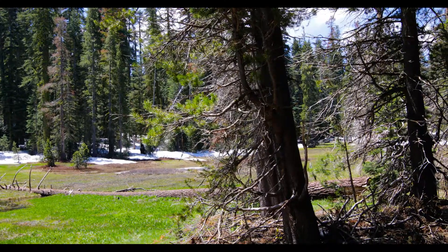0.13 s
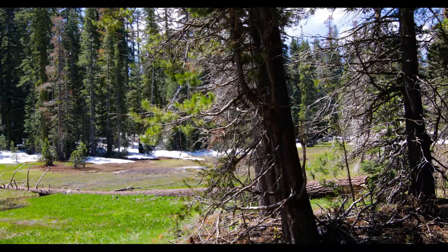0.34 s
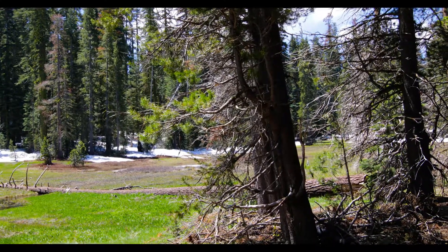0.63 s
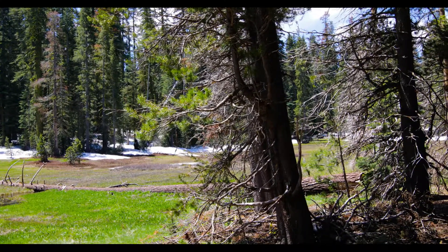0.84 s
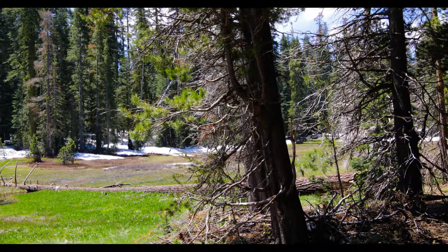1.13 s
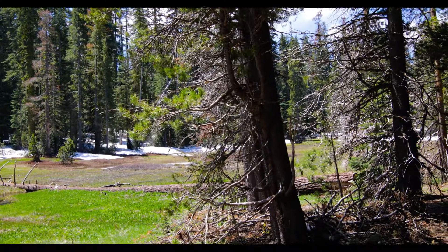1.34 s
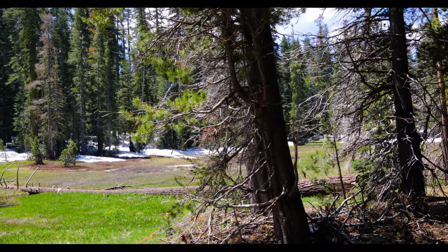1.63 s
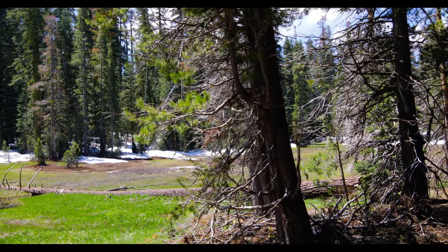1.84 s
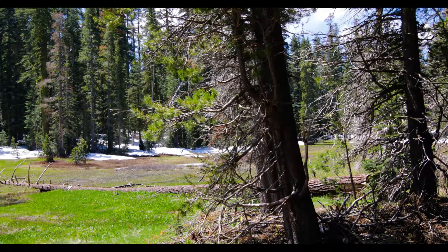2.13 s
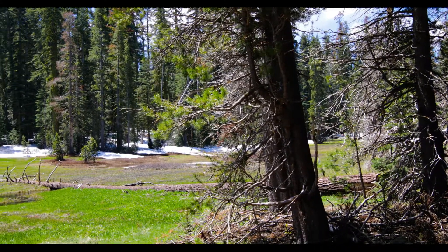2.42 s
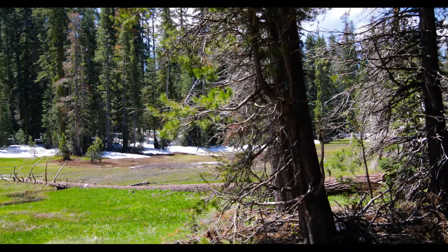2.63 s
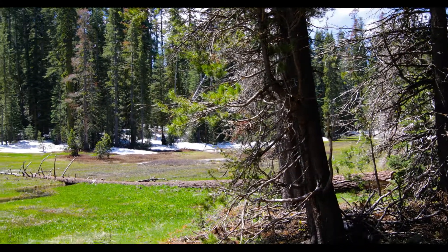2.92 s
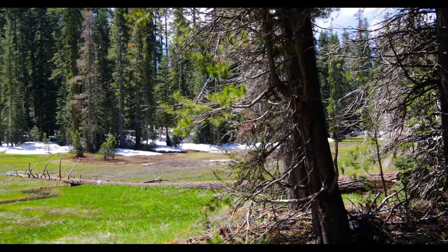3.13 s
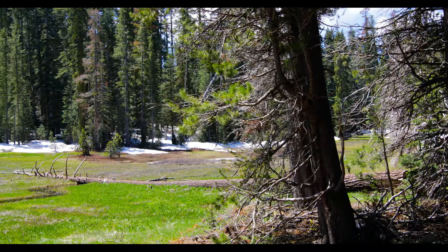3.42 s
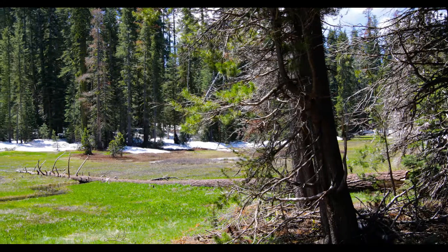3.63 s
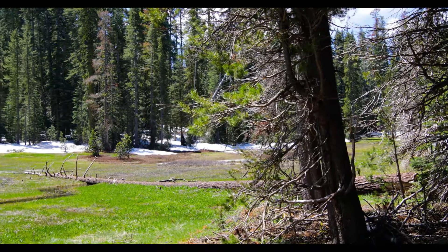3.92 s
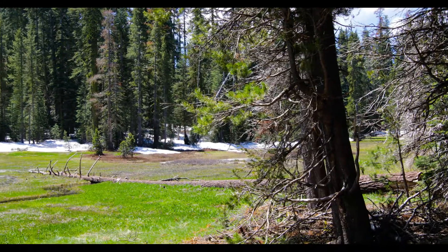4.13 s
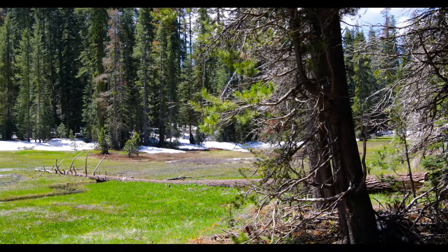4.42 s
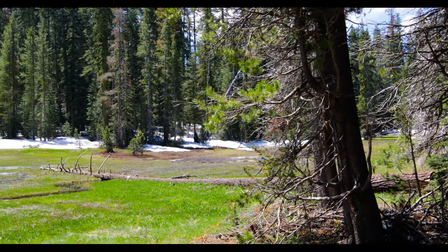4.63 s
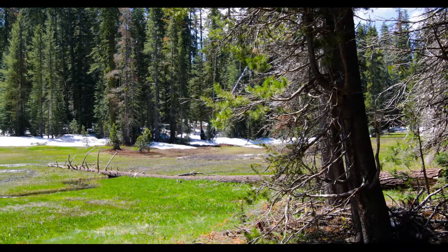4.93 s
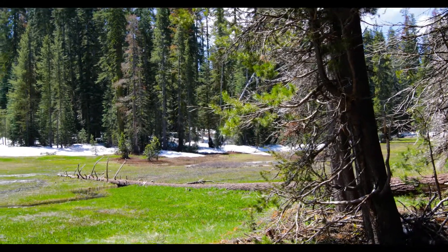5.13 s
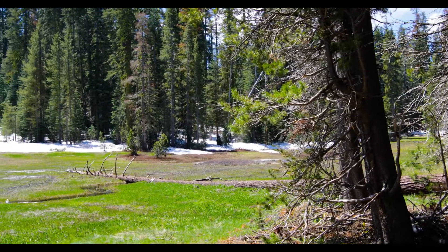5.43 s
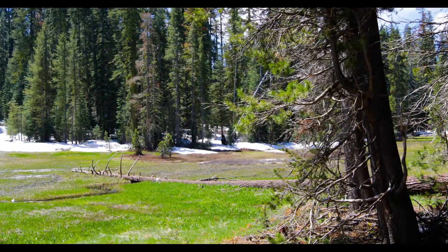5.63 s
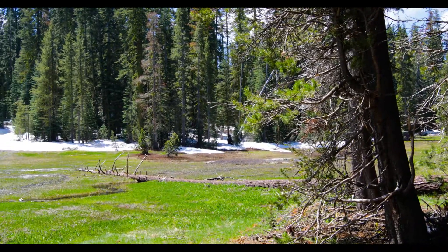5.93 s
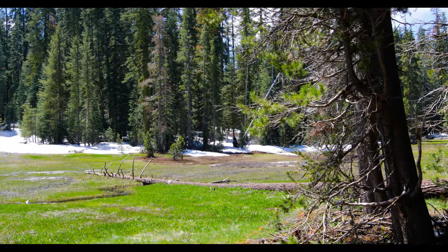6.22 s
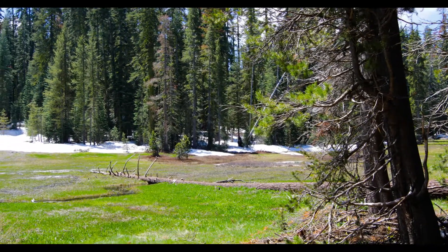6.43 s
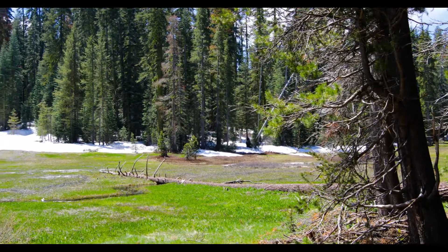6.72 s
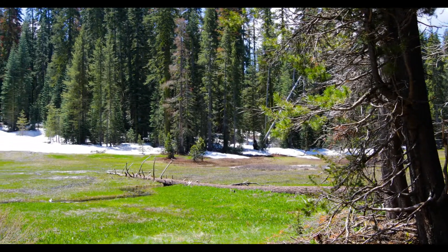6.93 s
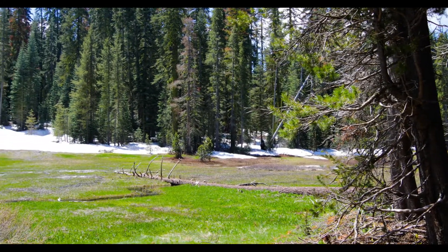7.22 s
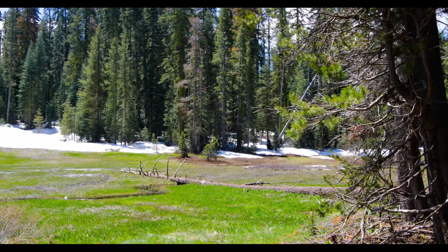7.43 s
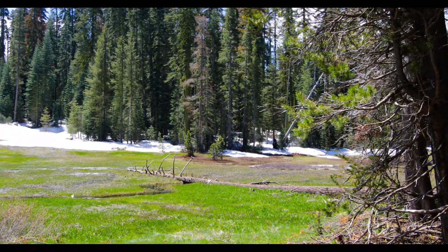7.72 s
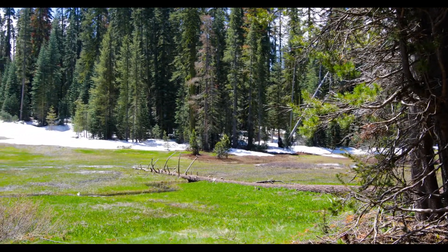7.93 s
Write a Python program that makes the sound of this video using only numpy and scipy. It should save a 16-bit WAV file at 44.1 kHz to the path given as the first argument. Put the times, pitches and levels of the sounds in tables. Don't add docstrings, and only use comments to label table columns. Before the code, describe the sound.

In a wet meadow ringed by conifers, nearby male frogs answer each other in quick pulsed croaks, some throaty and hollow, others higher and tighter, above a continuous blurred chorus. A quieter warbler sings quick sliding notes and a brief trill among faint twitter from one to five seconds, pauses, then returns at seven. One mono microphone low in the grass catches gentle low air, soft bumps and steady hush.

```python
import sys
import numpy as np
from scipy import signal
from scipy.fft import rfft, irfft
from scipy.io import wavfile
from scipy.ndimage import uniform_filter1d

SR = 44100
rng = np.random.default_rng(int(sys.argv[2]) if len(sys.argv) > 2 else 0)


def digitize_waveform(pressure):
    field = np.atleast_2d(pressure).T
    bounded = np.clip(field, -1, 1)
    quanta = np.round(bounded * 32767).astype(np.int16)
    wavfile.write(sys.argv[1], SR, quanta)


def ratio(d):
    e = np.asarray(d, float) / 20
    return 10 ** e


N = 355446
TIME = np.arange(N) / SR

# (first pulse [s], length [s], level [dB])
DEEP = [(.533, 0.051, -31), (1.408, 0.053, -28.5), (1.813, 0.04, -35.5), (2.168, 0.0506, -31),
        (2.261, 0.022, -38), (2.619, 0.056, -32.5), (2.901, 0.046, -31.5), (3.415, 0.0836, -33.5),
        (3.7, 0.016, -31), (4.188, 0.023, -31.5), (4.253, 0.019, -31.5), (4.412, 0.056, -31.5),
        (4.877, 0.049, -33.5), (5.184, 0.041, -31.5), (5.29, 0.019, -40), (5.541, 0.0505, -30),
        (5.629, 0.011, -31), (6.05, 0.075, -34.5), (6.6, 0.068, -37.5), (6.7, 0.049, -35),
        (7.058, 0.01, -32.5), (7.841, 0.019, -31.5), (7.901, 0.044, -31.5)]
# (first pulse [s], length [s], level [dB])
LARGE = [(.632, 0.03, -32), (1.317, 0.13, -43), (1.493, 0.056, -32), (3.003, 0.026, -28.5),
         (3.769, 0.035, -31.5), (3.977, 0.028, -34.5), (4.499, 0.019, -28), (4.749, 0.045, -37),
         (4.949, 0.032, -30.5), (5.241, 0.041, -35.5), (6.158, 0.036, -33), (6.724, 0.044, -35),
         (7.103, 0.054, -36), (7.4, 0.04, -37.5)]
# (first pulse [s], length [s], level [dB])
MIDDLE = [(.376, 0.104, -42), (.554, 0.024, -38), (1.432, 0.0096, -35), (1.775, 0.063, -40),
          (1.876, 0.057, -33.5), (2.561, 0.061, -37.5), (2.905, 0.04, -42), (3.094, 0.012, -30),
          (3.339, 0.09, -37.5), (3.414, 0.022, -37.5), (3.47, 0.0091, -30), (3.865, 0.0084, -30),
          (4.814, 0.014, -40), (4.059, 0.026, -34.5), (5.289, 0.056, -30.5), (5.905, 0.035, -35),
          (6.813, 0.025, -32.5), (7.466, 0.05, -33.5)]
# (first pulse [s], length [s], level [dB])
SMALL = [(.174, 0.058, -37), (.896, 0.1045, -35.5), (1.023, 0.0052, -30.5), (1.066, 0.052, -29.5),
         (1.558, 0.021, -37.5), (1.8, 0.088, -38), (2.282, 0.03, -31.5), (2.603, 0.084, -42),
         (2.718, 0.049, -33), (3.155, 0.077, -37), (3.493, 0.0706, -32.5), (3.608, 0.005, -31),
         (4.25, 0.036, -33.5), (4.46, 0.128, -34.5), (5.461, 0.04, -33.5), (6.35, 0.05, -38.5),
         (6.44, 0.068, -32.5), (.402, 0.037, -35.5), (.466, .004, -36.5), (5.837, 0.013, -39.5),
         (6.98, 0.037, -50)]
# (first pulse [s], length [s], level [dB])
TINY = [(.299, 0.02, -30), (.676, 0.069, -36), (1.173, 0.019, -31), (1.936, 0.034, -33), (2.02, 0.023, -32),
        (2.378, 0.039, -35), (3.289, 0.028, -31.5), (4.585, 0.036, -30), (5.054, 0.035, -34),
        (5.413, 0.011, -30), (5.568, 0.014, -34.5), (6.248, 0.049, -38), (6.564, 0.025, -32.5),
        (7.235, 0.055, -39.5), (7.571, 0.037, -33), (7.87, 0.011, -44)]
# (croaks, sac tone [Hz], pulse rate [1/s])
VOICES = [
    (DEEP, 1655, 140),
    (LARGE, 1810, 106),
    (MIDDLE, 1915, 100),
    (SMALL, 1995, 96),
    (TINY, 2085, 100),
]
# (first pulse [s], level [dB])
THROATY = [(0.475, -33), (0.899, -28.5), (1.092, -24.5), (1.507, -21), (1.686, -37), (2.03, -29.5),
           (2.275, -30), (2.688, -29), (2.852, -43), (3.077, -31.5), (3.285, -28.5), (3.551, -42.5),
           (3.968, -24), (4.497, -25.5), (5.057, -32.5), (5.194, -44), (5.55, -19), (6.244, -25),
           (6.69, -24), (6.888, -53), (7.12, -35), (7.391, -30), (6.755, -25), (6.8, -21.5), (4.42, -26),
           (4.59, -31.5)]
# (time [s], level [dB])
THROAT = [
    (0, -15.5),
    (3.7, -16),
    (4, -12),
    (4.4, -15.5),
    (5.5, -12),
    (5.8, -15),
    (6.3, -12),
    (6.72, -17),
    (7.1, -16.5),
    (7.6, -16.5),
]
# (time [s], level [dB])
CHORUS = [(0, -37), (.6, -35.5), (1.1, -37), (1.27, -40), (1.5, -35.5), (1.7, -40.5), (2.3, -37.5),
          (2.48, -42), (2.7, -32.5), (2.84, -38.5), (4.1, -37), (4.35, -40.5), (5.0, -37.5), (5.6, -35.5),
          (5.75, -41.5), (6.6, -38.5), (7.7, -36.5), (8.06, -34.5)]

# (time [s], start pitch [Hz], end pitch [Hz], level [dB])
FALLS = [(2.179, 3370, 2530, -52), (2.03, 4490, 3840, -62), (1.98, 4750, 4160, -64),
         (2.195, 4400, 3730, -67), (2.378, 4250, 3460, -62), (2.565, 3310, 2920, -48.5),
         (2.69, 2950, 2320, -59), (2.968, 3230, 2650, -46.5), (3.188, 4900, 3806, -69),
         (3.46, 4700, 3750, -63), (3.483, 3500, 2740, -54), (3.68, 3500, 2480, -55),
         (3.807, 3410, 2370, -50.5), (3.98, 3680, 2600, -50.5), (4.57, 4880, 4400, -70),
         (4.638, 3600, 2520, -55), (4.919, 4280, 3580, -62.5), (1.67, 3930, 2550, -60),
         (1.72, 4700, 4000, -74), (7.124, 4340, 3330, -71), (7.49, 4200, 4000, -61),
         (7.627, 3240, 2520, -53), (7.775, 4460, 3700, -66), (2.142, 2780, 2500, -52)]
# (time [s], start pitch [Hz], end pitch [Hz], level [dB])
RISES = [(1.345, 5300, 6400, -72), (1.467, 5230, 6400, -70), (1.585, 5050, 6500, -66),
         (1.78, 3860, 4770, -67), (1.96, 4200, 4690, -64), (2.229, 2560, 2920, -54),
         (2.25, 2960, 3110, -48.5), (2.275, 3020, 3100, -60), (2.16, 2700, 3700, -58),
         (2.319, 4150, 4950, -61.5), (2.34, 3200, 4210, -62), (2.502, 3470, 4430, -51.5),
         (2.548, 2700, 3370, -57), (2.672, 2760, 3270, -49.5), (2.656, 2610, 2790, -51),
         (2.71, 3170, 4280, -66), (2.872, 2900, 3700, -66), (3.214, 3480, 4030, -57),
         (3.247, 2875, 4020, -53), (3.28, 2590, 3750, -50), (3.317, 2650, 3970, -52),
         (3.609, 2680, 3440, -54), (3.874, 3200, 3370, -54), (3.893, 3350, 4480, -62),
         (4.535, 3270, 4040, -60), (4.73, 3720, 4040, -70), (4.806, 3140, 3560, -61),
         (5.912, 3010, 3110, -59), (7.12, 2730, 2970, -53), (7.96, 2820, 4350, -58)]
# (starts [s], notes as (delay [s], start pitch [Hz], end pitch [Hz], level [dB]))
SYLLABLES = [
    ([.942, 1.077, 1.211], [(0, 3850, 4230, -60), (.059, 5150, 3550, -63)]),
    ([7.238, 7.408, 7.578], [(.004, 3600, 4750, -63), (.034, 3400, 4400, -62), (.06, 4350, 3450, -62)]),
]
# (time [s], length [s], start pitch [Hz], end pitch [Hz], level [dB])
DRAWLS = [
    (1.995, .075, 4350, 3700, -60),
    (4.405, .016, 3750, 3800, -64),
    (3.068, .048, 4710, 3550, -61),
    (7.967, .075, 4500, 3750, -56),
    (7.7, .1, 660, 420, -62),
]
# (time [s], length [s], start
# pitch [Hz], end pitch [Hz], level [dB])
PACED = [(2.155, .012, 4270, 4500, -67), (2.17, .008, 4000, 3340, -60), (2.479, 0.022, 3180, 3920, -54.5),
         (2.528, 0.011, 4500, 2600, -52.5), (2.785, 0.013, 4840, 3150, -57),
         (2.803, 0.014, 3500, 4600, -56), (2.818, 0.034, 4310, 4490, -59.5), (2.87, 0.12, 4440, 4430, -74),
         (2.835, .012, 5200, 4500, -68), (2.903, 0.016, 3900, 2900, -68), (2.95, .01, 3900, 4000, -69),
         (2.978, 0.012, 5300, 4530, -67), (2.997, 0.0081, 5200, 4300, -70), (4.288, 0.014, 4620, 3600, -75),
         (4.147, .01, 3500, 2800, -55.5), (4.205, .012, 3300, 2400, -55), (4.278, 0.033, 2800, 3210, -49.5),
         (4.336, 0.018, 4750, 4350, -75), (4.382, 0.066, 4980, 3840, -71), (4.468, .012, 2880, 2750, -50),
         (4.525, .012, 3440, 3320, -58), (4.195, 0.02, 5400, 4900, -82), (4.657, 0.037, 4600, 3720, -65),
         (4.662, 0.028, 2650, 2600, -61), (4.705, .015, 4330, 4200, -69), (4.799, .011, 5100, 4500, -70),
         (4.825, 0.031, 3910, 4020, -62), (4.881, 0.02, 4800, 4300, -69),
         (1.338, .04, 7800, 7300, -78), (6.83, .04, 8100, 7800, -78), (4.78, .04, 8700, 8400, -83),
         (.835, .02, 4400, 4200, -68), (3.265, .02, 4700, 4200, -66), (4.6, .014, 4100, 3100, -64),
         (3.562, .012, 3820, 3780, -62), (3.545, .012, 5150, 5200, -69), (3.765, .018, 4100, 3600, -62),
         (4.098, .016, 4500, 3700, -66), (3.645, .014, 4750, 4600, -68), (3.015, .025, 4700, 5300, -68),
         (4.175, .02, 4600, 4250, -74), (1.095, .02, 3100, 3400, -58), (1.245, .012, 3800, 4300, -65),
         (.975, .012, 3800, 4300, -65), (7.682, .019, 5500, 4700, -66), (2.166, .012, 3000, 3200, -53),
         (2.7, .012, 3800, 3800, -66), (2.52, .012, 4200, 4700, -62), (2.66, .012, 4200, 4800, -70),
         (2.68, .01, 4800, 4200, -70), (3.09, .05, 2700, 2350, -56), (4.73, .015, 3700, 4100, -62),
         (3.165, .014, 5600, 4600, -70), (2.565, .012, 4100, 3700, -62), (3.215, .024, 4900, 5300, -69),
         (.9, .014, 3300, 3100, -58), (3.37, .012, 5300, 4600, -74), (3.775, .012, 3400, 3150, -57),
         (4.02, .012, 2750, 2650, -55), (4.06, .012, 3300, 2800, -60)]
# (time [s], length [s], middle pitch [Hz], level [dB])
TRILLS = [
    (1.773, 0.16, 3490, -48),
    (7.723, 0.15, 3470, -44.5),
]
# (time [s], hold [s], pitch [Hz], level [dB])
SEEP = [(0.868, 0.089, 7420, -75.5), (1.62, 0.08, 7100, -74), (1.967, 0.093, 7210, -67.5),
        (2.374, 0.049, 6020, -69.5), (3.974, 0.083, 6720, -76), (4.31, 0.047, 6800, -73),
        (4.6, .08, 6780, -76), (4.897, 0.054, 6900, -74), (5.199, 0.078, 6900, -72),
        (6.666, 0.044, 7040, -69), (6.741, 0.02, 7060, -63), (6.935, .059, 7430, -77),
        (7.143, 0.079, 7060, -67.5), (7.507, 0.1, 7360, -61), (7.827, 0.12, 7510, -60)]
# (time [s], length [s], pitch [Hz], level [dB])
RATTLES = [
    (.29, .04, 5200, -74),
    (1.085, .035, 5200, -72),
    (1.095, .03, 7700, -76),
    (2.73, .04, 5600, -75),
    (2.612, .05, 7700, -75),
    (2.715, .06, 7700, -69),
    (5.04, .08, 8300, -76),
    (7.92, .05, 5000, -70),
    (7.94, .04, 5800, -72),
]
CHIPS_DOWN = [1.712, 1.884, 2.063, 2.247, 2.425, 3.626, 7.17, 7.343, 7.511]
CHIPS_UP = [
    2.9,
]
# (from [s], to [s], slurs [count])
TWITTER = [
    (.9, 5.0, 150),
    (7.1, 8.06, 35),
]

# (time [s], level [dB])
BREEZE = [(0, -72), (.6, -49), (.72, -67), (1.8, -77), (2.0, -49.5), (2.12, -68), (2.4, -54), (2.6, -87),
          (3.45, -61), (3.7, -71), (6.6, -83), (7.0, -57.5), (7.5, -55.5), (7.7, -71), (8.06, -61)]
# (time [s], peak level [dB], ring [Hz])
KNOCKS = [(0.019, -55, 59.2), (0.069, -54, 99.6), (0.31, -47.5, 106), (0.382, -39, 119), (0.547, -51, 47.4),
          (0.635, -46, 100), (0.957, -59, 72), (1.979, -48.5, 78), (2.319, -58, 109), (7.35, -55, 59.2),
          (7.419, -56, 45.8), (7.529, -53, 97)]
# (time [s], peak level [dB], ring [Hz])
TICKS = [
    (2.218, -43, 500),
    (3.51, -58, 6000),
    (5.022, -60, 4500),
]
# (frequency [Hz], density [dB per Hz])
HUSH = [(30, -104), (90, -90), (190, -82), (300, -87.5), (560, -89), (800, -81), (1350, -82), (2500, -87),
        (3100, -90.5), (4000, -101), (5200, -111), (6800, -111), (8700, -114), (10000, -108), (15500, -112)]

LEAD_S = .05


def at_times(rows, s=TIME):
    return np.interp(s, *np.transpose(rows))


def rms_one(x):
    return x / np.sqrt(np.mean(x ** 2) + 1e-20)


def add(track, start_s, sound):
    i = round(start_s * SR)
    part = sound[max(-i, 0):max(N - i, 0)]
    track[max(i, 0):max(i, 0) + len(part)] += part


def drift(rate):
    knots = rng.standard_normal(int(N / SR * 40) + 2)
    smooth = uniform_filter1d(knots, max(int(40 / rate), 1))
    return np.interp(TIME * 40, np.arange(len(knots)), rms_one(smooth))


def flutter():
    lowpass = signal.butter(2, 90, fs=SR, output="sos")
    return ratio(2.0 * rms_one(signal.sosfilt(lowpass, rng.standard_normal(N))))


def echo(x, t60, wet_db):
    t = np.arange(SR // 2) / SR
    tail = rng.standard_normal(len(t)) * ratio(-60 * t / t60) * (t > .012)
    return x + ratio(wet_db) * signal.fftconvolve(x, tail / np.linalg.norm(tail))[:N]


def croak(length, sac_hz, rate, throat_db, chance):
    t = np.arange(-LEAD_S, length + 0.2, 1 / SR)
    knots = np.arange(len(chance))
    rise_s = np.clip((2000 - sac_hz) / 19000, .003, .018)
    before = np.minimum(t + .002, 0) / rise_s
    after = np.maximum(t - length, 0) / 0.0097
    swell = np.exp(-before ** 2 - after ** 2)
    swell = swell * (.88 + .12 * np.sin(np.pi * np.clip(t / length, 0, 1)))

    turn = (t + .001) * rate + 8.25
    turn = turn + .12 * (np.interp(turn, knots, chance[::-1, 1]) - chance[-9, 1])
    depth = np.clip((sac_hz - 1300) / 520, .6, 1)
    width = np.where(turn % 1 < .25, .2, .38)
    burst = np.exp(-((turn % 1 - .25) / width) ** 2)

    change = np.clip(2.5 * ((turn + .3) % 1), 0, 1)
    step = np.floor(turn + .3) + np.sin(np.pi / 2 * change) ** 2
    start, strength = [np.interp(step, knots, c) for c in chance.T]

    phase = 2 * np.pi * sac_hz * t * (1 + .7 / 2 * (t - length)) + 2.0 * depth * start
    sag_hz = 330 * np.clip(2.3 * depth - 1.5, .2, 1)
    phase = phase - np.pi * sag_hz * (turn % 1 - .5) ** 2 / rate
    sac = (1 - depth + depth * burst) * (np.sin(phase) + ratio(-22) * np.sin(1.5 * phase))
    throat_hz = 1026.6 + 0.2366 * (sac_hz - 1900) + 50 * np.clip(chance[0, 0], -1.5, 1.5)
    throat = ratio(throat_db) * burst * np.sin(2 * np.pi * throat_hz * t + 2.94 * start)
    sac = signal.sosfilt(signal.butter(2, 1.15 * sac_hz, fs=SR, output="sos"), sac)
    return swell * rms_one(ratio(1.0 * strength) * (sac + throat))


def near_frogs():
    out = np.zeros(N)
    rows = []
    for croaks, hz, rate in VOICES:
        for s, length, db in croaks:
            rows.append((s, length, hz, rate, db, at_times(THROAT, s) - 3))
    rows += [(s, 0.032, 1900, 95, db - 17, 7) for s, db in THROATY]
    chances = rng.standard_normal((len(rows), 48, 2))
    for (s, length, hz, rate, db, throat_db), chance in zip(rows, chances):
        add(out, s - LEAD_S, ratio(db) * croak(length, hz, rate, throat_db, chance))
    return echo(out, t60=.25, wet_db=-11.5)


def far_frogs():
    out = np.zeros(N)
    for when, size, build, pace, far in rng.random((420, 5)):
        s = when * (N / SR + .2) - .2
        sac_hz = 1540 + 390 * size + 280 * build
        throat_db = at_times(THROAT, s) + 4
        chance = rng.standard_normal((48, 2))
        sound = croak(0.02 + 0.0508 * pace, sac_hz, 85 + 40 * pace, throat_db, chance)
        add(out, s, ratio(-9 * far) * sound)
    out = echo(out, t60=0.75, wet_db=-4)
    level = np.sqrt(uniform_filter1d(out ** 2, SR // 6))
    return ratio(at_times(CHORUS)) * out / level


def answer(near):
    power = np.abs(uniform_filter1d(near ** 2, int(0.072 * SR)))
    loud_db = 10 * np.log10(power + ratio(2 * -32.5))
    return ratio(0.21 * (loud_db - loud_db.mean()))


def birds(notes, bend, wet_db):
    out = np.zeros(N)
    for s, length, start_hz, end_hz, db in notes:
        u = np.linspace(0, 1, round(1.5 * length * SR))
        hz = end_hz + (start_hz - end_hz) * (1 - u) ** bend
        tone = np.sin(2 * np.pi * np.cumsum(hz) / SR)
        add(out, s - 0.11 * length, ratio(db + 6.0) * np.sin(np.pi * u) ** .6 * tone)
    return echo(out * ratio(1.0 * drift(40)) * flutter(), t60=.4, wet_db=wet_db)


def warble():
    sung = [(s + delay, *note) for starts, notes in SYLLABLES for s in starts for delay, *note in notes]
    slurs = []
    for s, start, end, db in FALLS + RISES + sung:
        length = .016 + abs(end - start) / 170000
        slurs.append((s, length, start, end, db))
    return slurs + DRAWLS + PACED


def trills():
    climb_s, turn_s, climb_hz, swing_hz = .042, .037, 450, 310
    out = np.zeros(N)
    for s, length, middle_hz, db in TRILLS:
        t = np.arange(0, length, 1 / SR)
        wave = np.cos(2 * np.pi * np.maximum(t - climb_s, 0) / turn_s)
        climb = np.maximum(1 - (t / climb_s) ** 2, 0)
        hz = middle_hz + swing_hz * wave - (climb_hz + swing_hz) * climb
        gain = ratio(db - 4 * (hz - middle_hz) / swing_hz)
        swell = np.sin(np.pi * t / length) ** 0.24
        add(out, s, gain * swell * np.sin(2 * np.pi * np.cumsum(hz) / SR))
    return echo(out * flutter(), t60=.45, wet_db=-6)


def seeps():
    drop_s, drop_hz, drop_db = .045, 500, -5
    drops = []
    for s, hold, hz, db in SEEP:
        if hold > .075:
            drops.append((s - drop_s, drop_s, hz + drop_hz, hz, min(db, -64) + drop_db))
    return drops + [(s, hold, hz + 110, hz, db) for s, hold, hz, db in SEEP]


def rattles():
    out = np.zeros(N)
    for s, length, hz, db in RATTLES:
        t = np.arange(0, length, 1 / SR)
        click = np.exp(-((t * 90 % 1 - .5) / .15) ** 2)
        tone = np.sin(2 * np.pi * hz * t + 2 * np.sin(2 * np.pi * 260 * t))
        add(out, s, ratio(db + 8) * click * tone)
    return out


def far_twitter():
    rows = [(s, .018, 5400, 4750, -70) for s in CHIPS_DOWN]
    rows += [(s, .024, 4850, 5250, -70) for s in CHIPS_UP]
    for t0, t1, count in TWITTER:
        for when, pitch, slide, far in rng.random((count, 4)):
            hz = 3100 + 1300 * pitch
            start, end = (hz, .78 * hz) if slide < .7 else (.82 * hz, hz)
            s = t0 + when * (t1 - t0)
            rows.append((s, .015 + .02 * far, start, end, -62 - 14 * pitch - 9 * far))
    return rows


def bumps(events, cycles):
    out = np.zeros(N)
    for s, db, hz in events:
        turns = np.arange(0, 4 * cycles, hz / SR)
        swell = turns / cycles * np.exp(-(turns / cycles) ** 2)
        add(out, s, ratio(db + 20.5) * np.sin(2 * np.pi * turns) * swell)
    return out


def breeze():
    band = signal.butter(2, [28, 110], "band", fs=SR, output="sos")
    low = signal.sosfilt(band, rng.standard_normal(N))
    return ratio(at_times(BREEZE)) * rms_one(low * ratio(3.5 * drift(9)))


def hush():
    hz, db = np.transpose(HUSH)
    grid = np.arange(N // 2 + 1) * SR / N + 1
    gain = ratio(np.interp(np.log(grid), np.log(hz), db))
    return np.sqrt(SR / 2) * irfft(rfft(rng.standard_normal(N)) * gain, N)


def scene():
    near = near_frogs()
    frogs = near + answer(near) * far_frogs()
    song = birds(warble(), bend=1.05, wet_db=-2.5) + trills()
    song = song + birds(far_twitter(), bend=1.3, wet_db=-2)
    song = song + birds(seeps(), bend=1.3, wet_db=-7) + rattles()
    handling = bumps(KNOCKS, cycles=0.4) + bumps(TICKS, cycles=0.6)
    return (frogs + song + handling + breeze() + hush())[None]


def low_pass(x):
    return signal.sosfilt(signal.butter(12, 15640, fs=SR, output="sos"), x)


def record(dry):
    return low_pass(dry)


dry = scene()
out = record(dry)
digitize_waveform(out)
```